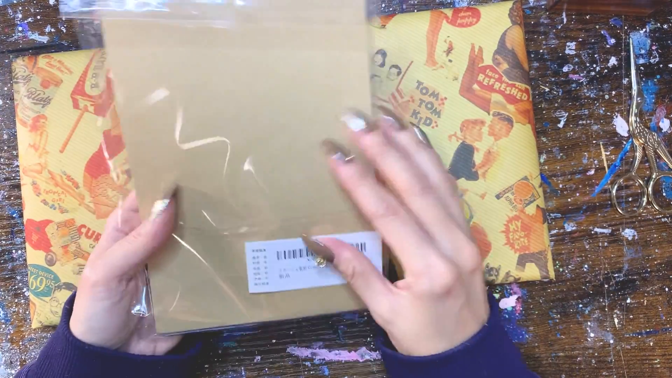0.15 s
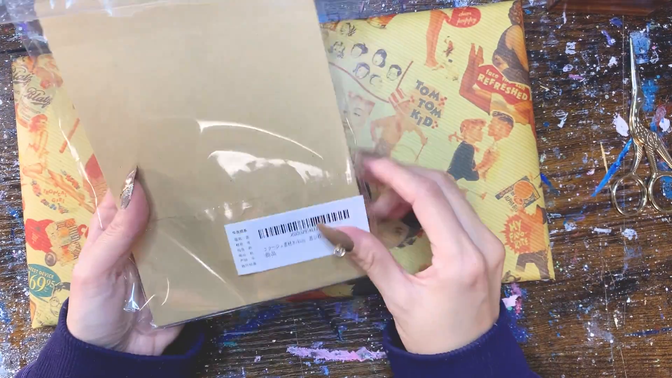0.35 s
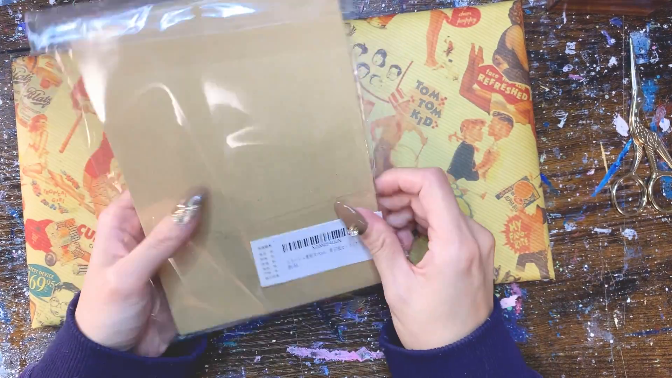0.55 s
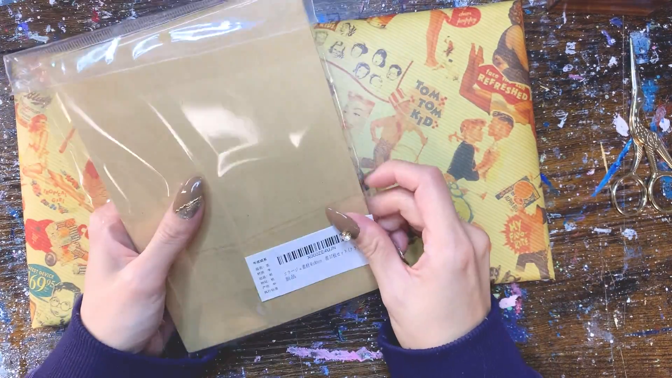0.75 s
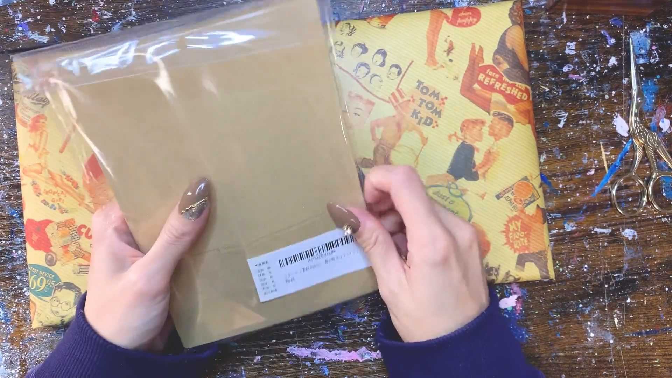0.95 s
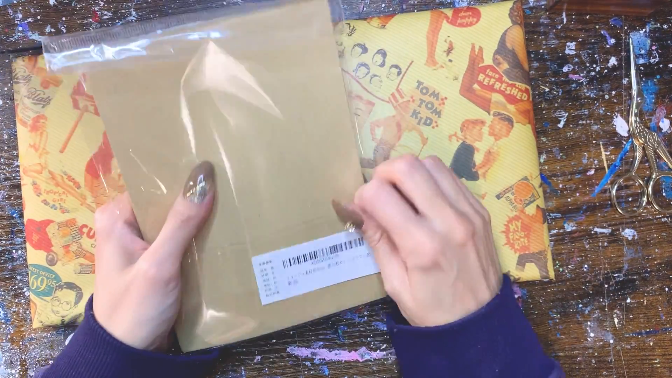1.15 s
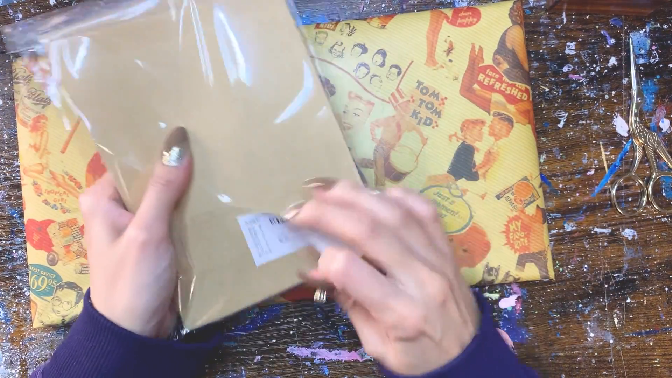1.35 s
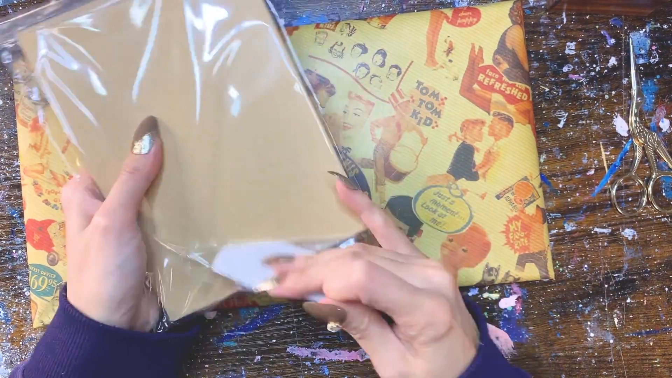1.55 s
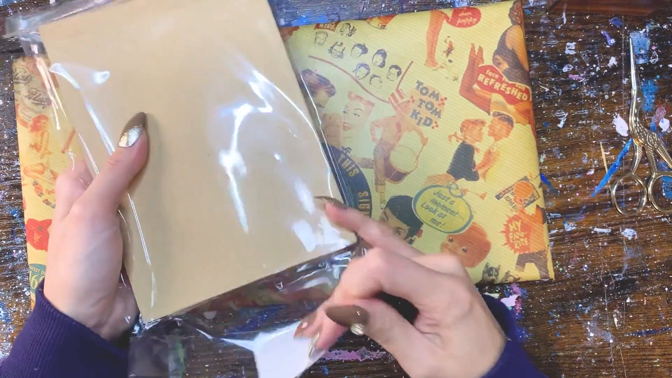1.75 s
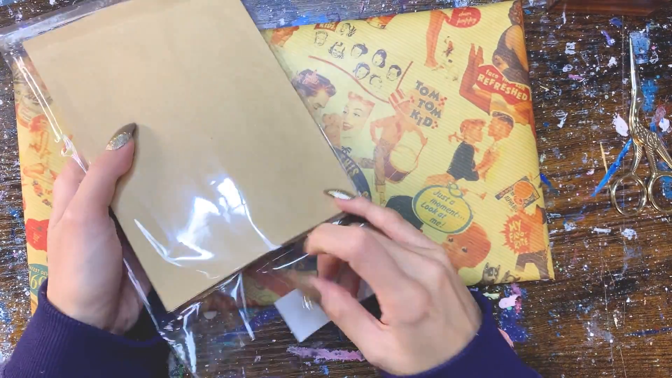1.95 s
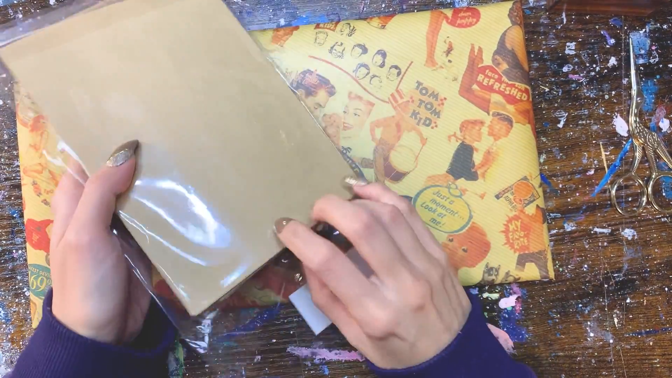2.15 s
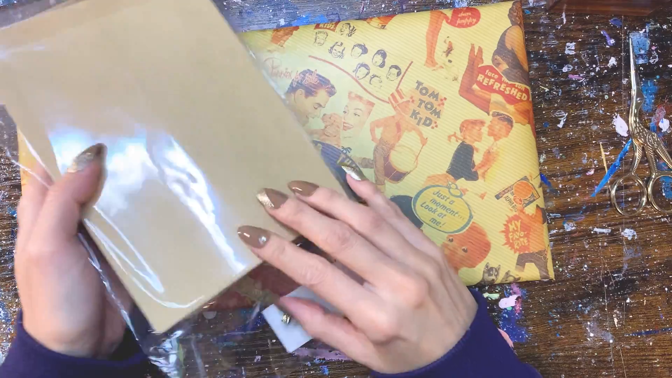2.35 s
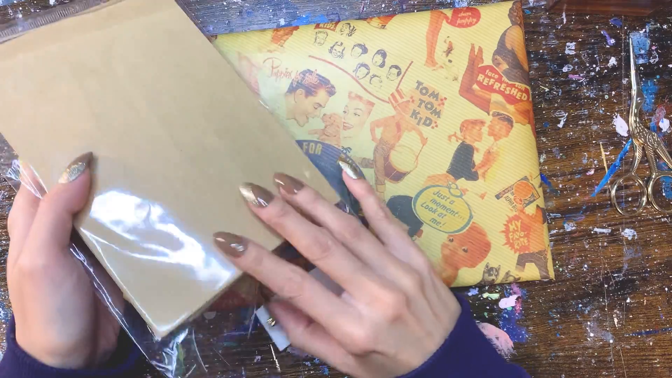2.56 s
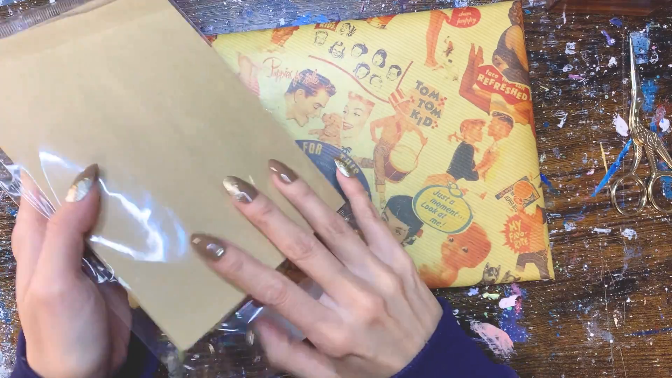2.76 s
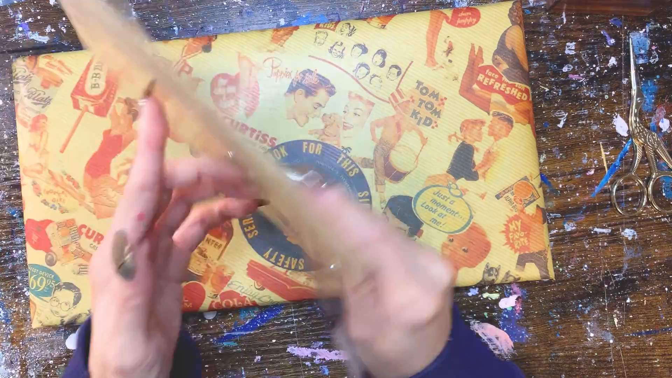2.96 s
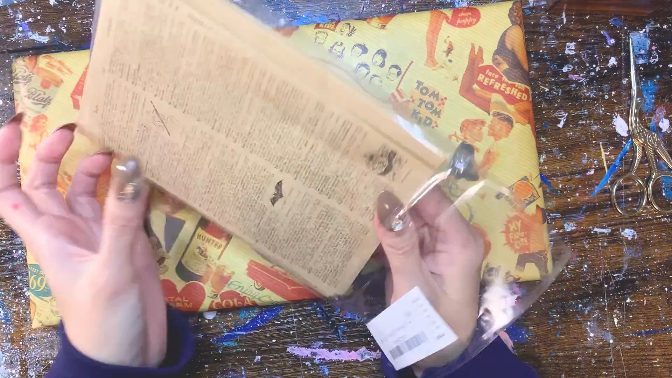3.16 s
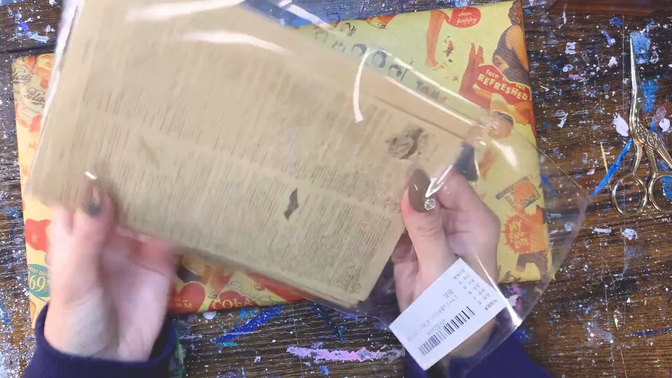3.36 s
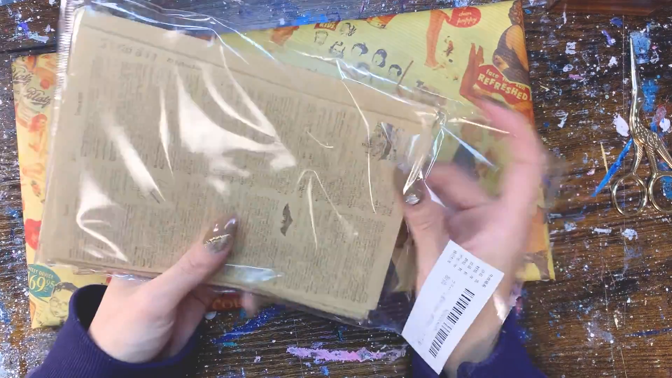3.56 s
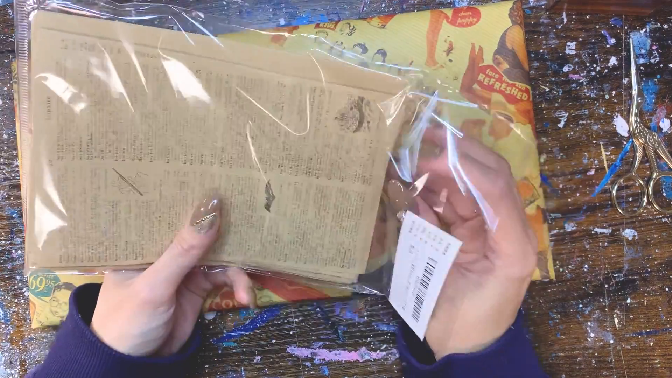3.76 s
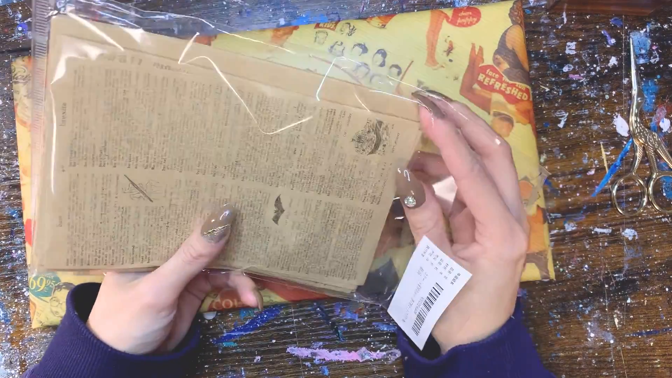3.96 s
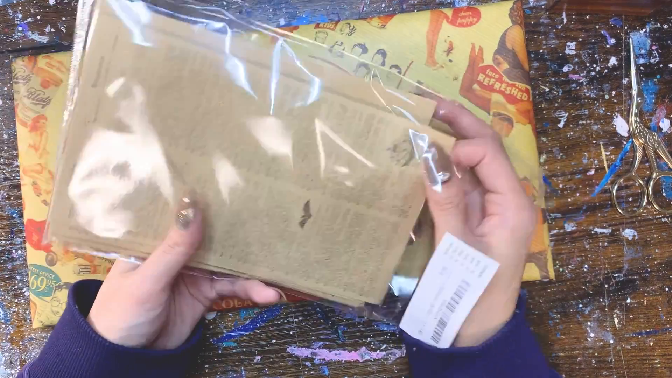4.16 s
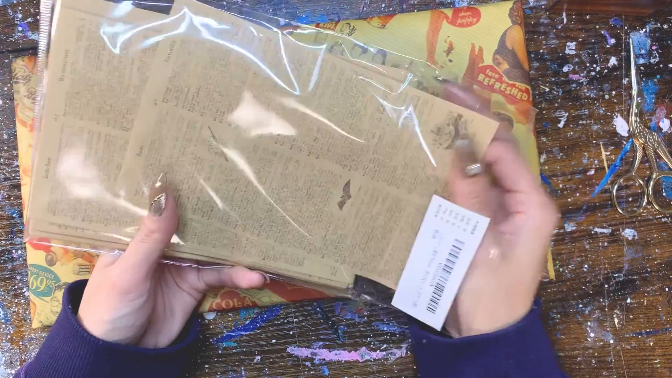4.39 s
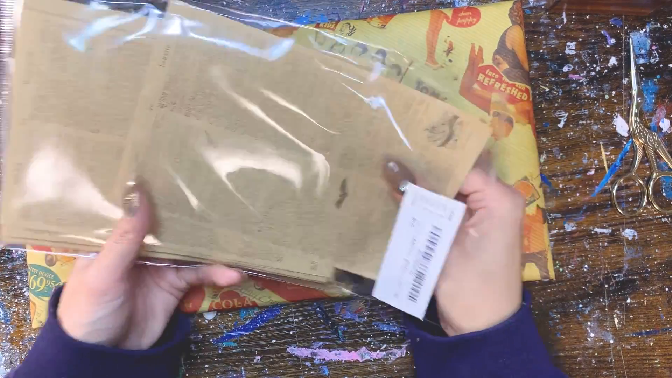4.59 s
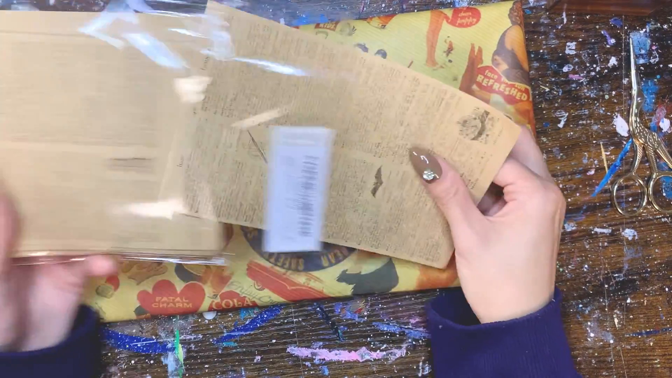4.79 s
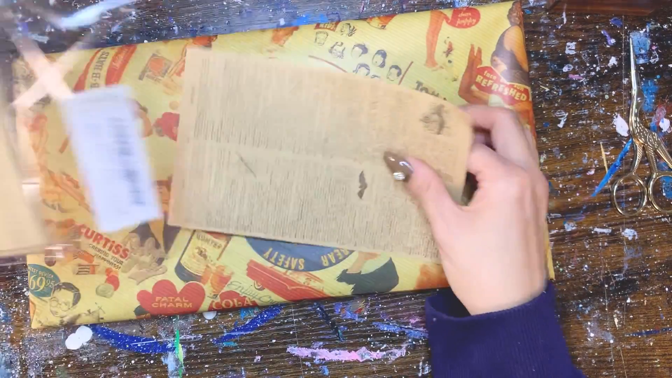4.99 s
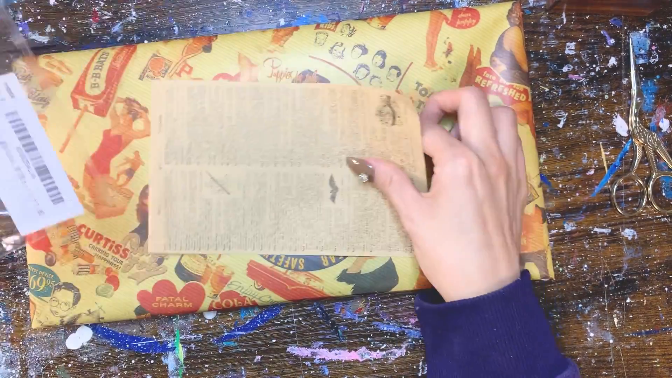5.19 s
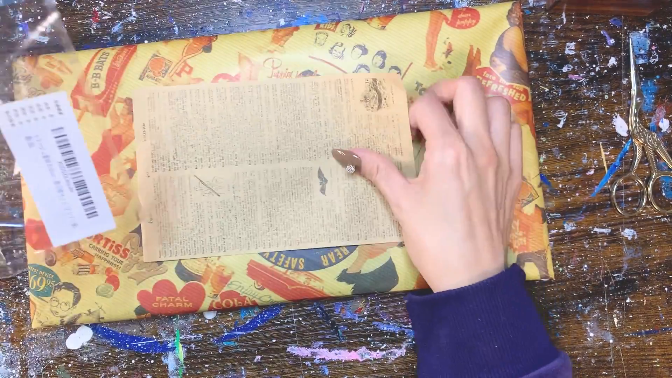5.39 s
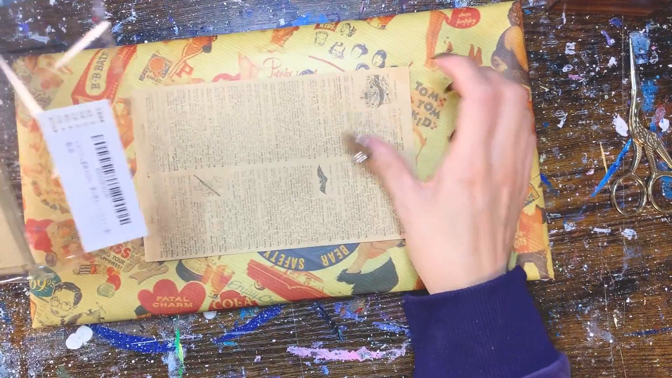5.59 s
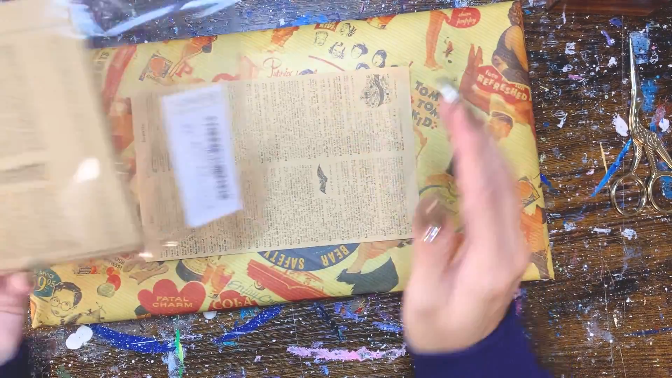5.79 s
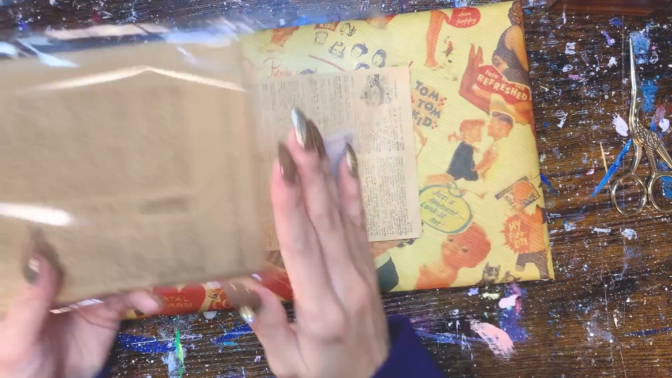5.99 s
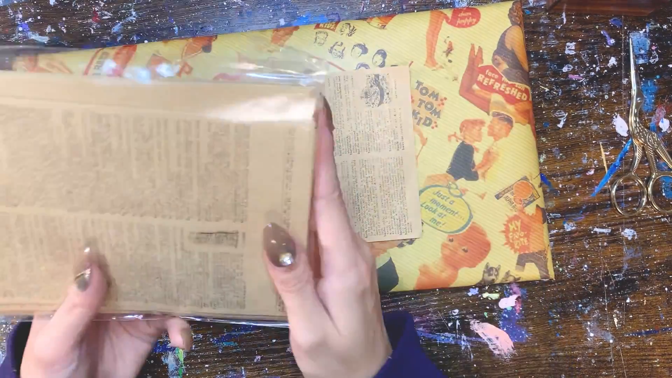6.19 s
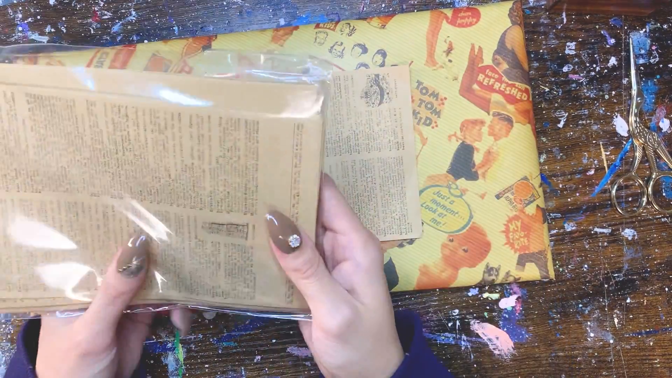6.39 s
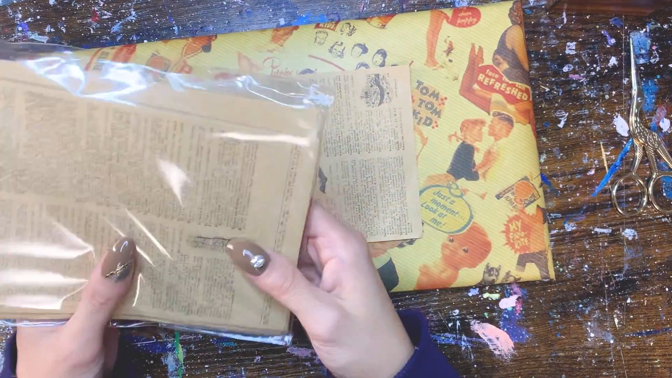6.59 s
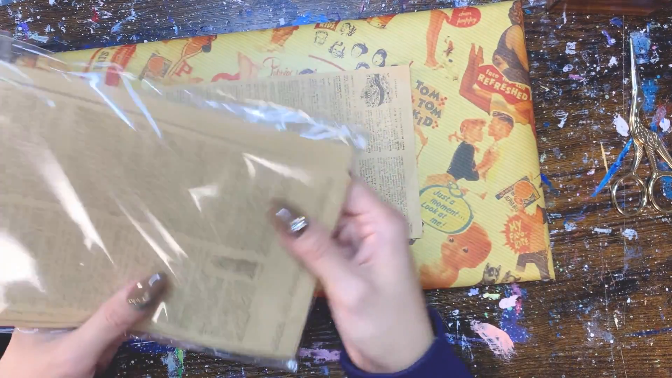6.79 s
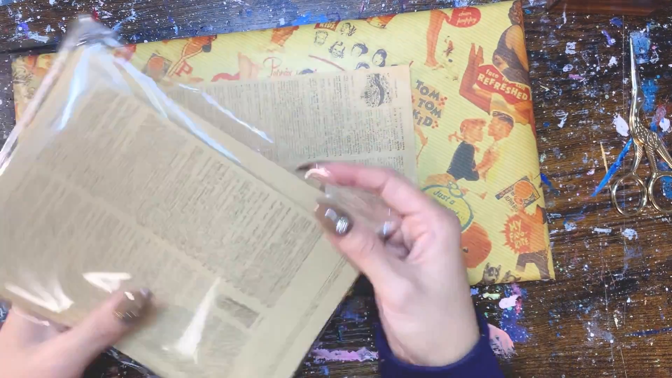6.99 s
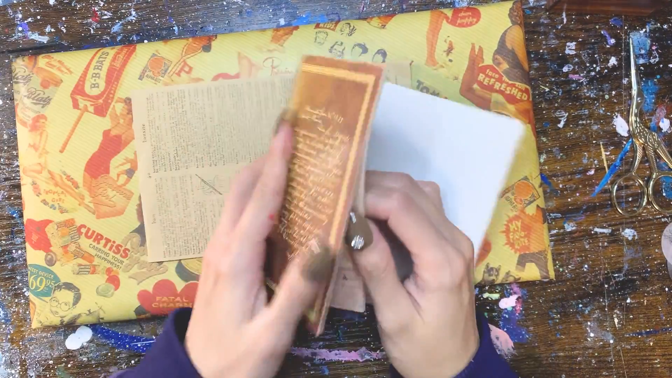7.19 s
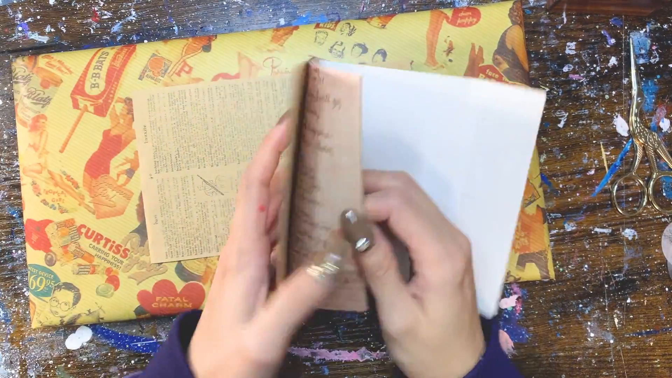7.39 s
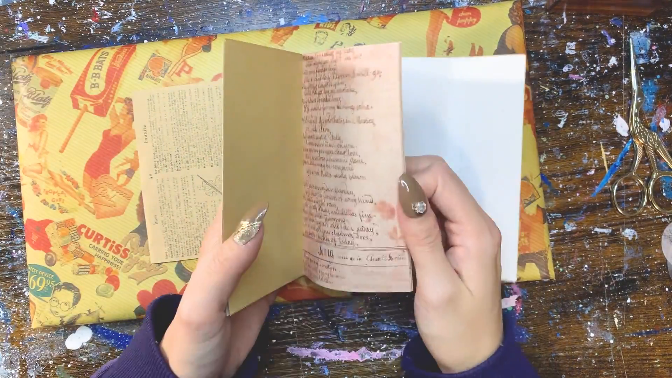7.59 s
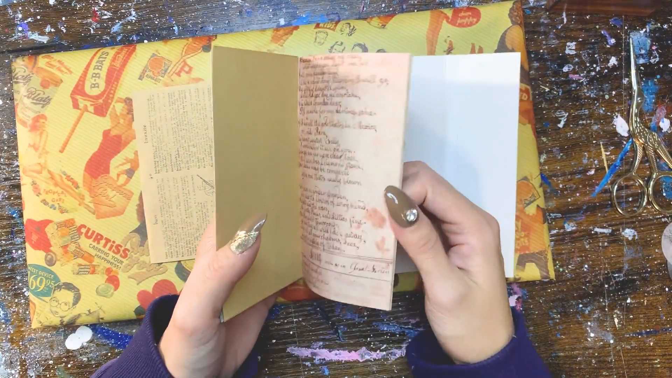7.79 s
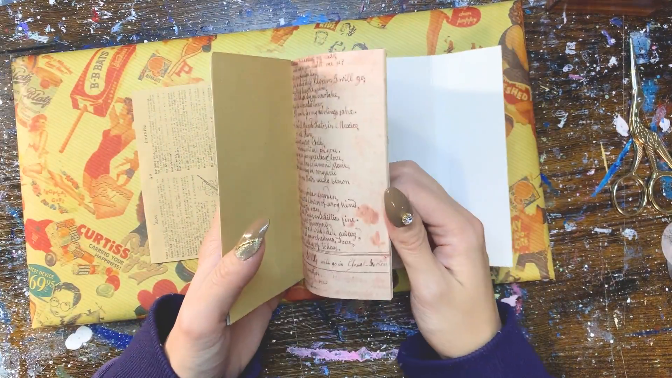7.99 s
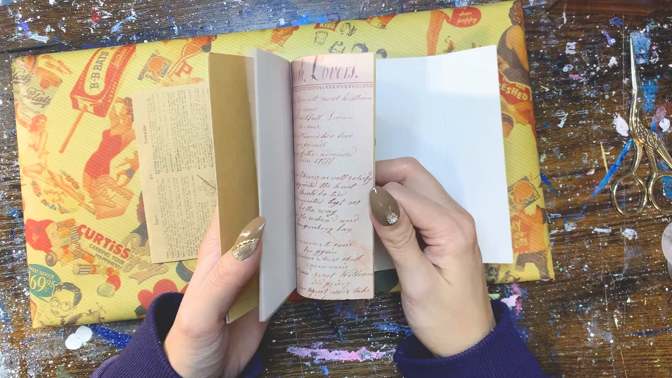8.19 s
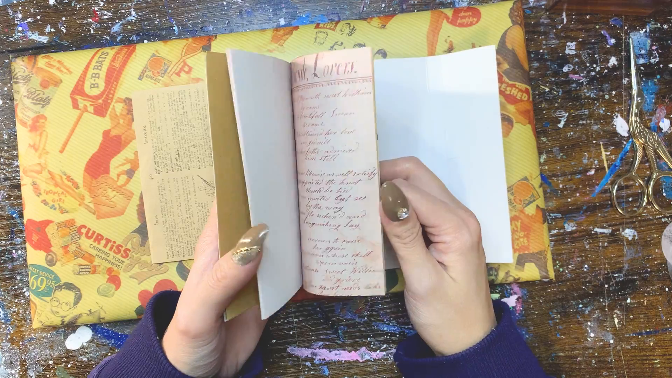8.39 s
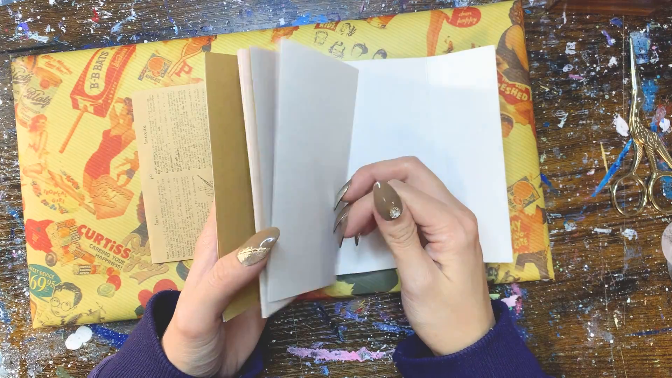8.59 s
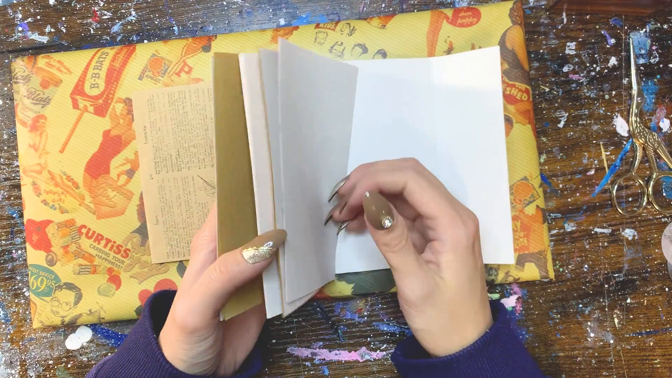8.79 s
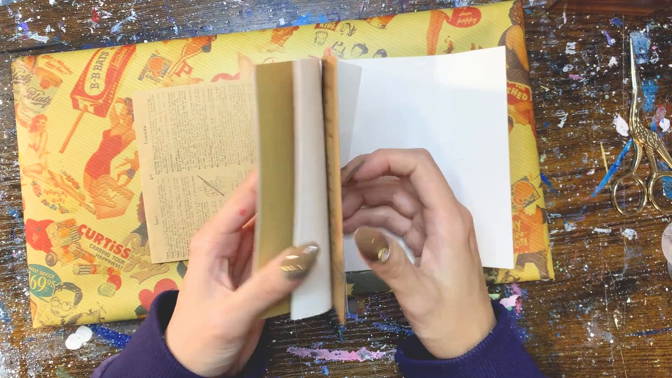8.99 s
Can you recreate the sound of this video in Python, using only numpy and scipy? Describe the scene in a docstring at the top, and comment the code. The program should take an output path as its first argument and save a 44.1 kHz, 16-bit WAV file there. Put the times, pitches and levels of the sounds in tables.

```python
"""A desk in a small quiet room: hands peel open a crisp plastic sleeve over a paper-wrapped parcel,
slide a paper sheet out and leaf through a booklet, with a stereo phone close above.
Creases snap over finer crackle, and film, sheet and page edges knock: noise bursts drive damped resonances.
Sliding sheets hiss as coloured noise under a hand envelope; the parcel thuds as falling, decaying tones.
Room tone, a short diffuse tail and two differing microphone ports surround them."""
import sys
import numpy as np
from scipy import signal
from scipy.fft import rfft, irfft
from scipy.io import wavfile
from scipy.ndimage import uniform_filter1d

SR = 44100
rng = np.random.default_rng(int(sys.argv[2]) if len(sys.argv) > 2 else 0)


def wav_record(signal):
    """Record a signal, one row per channel, as 16-bit PCM in the file named by sys.argv[1]."""
    frames = np.transpose(np.atleast_2d(signal))
    bounded = np.clip(frames, -1, 1)
    # unit amplitude maps onto the largest positive 16-bit level
    quanta = np.round(bounded * 32767).astype(np.int16)
    wavfile.write(sys.argv[1], SR, quanta)


N = 399105
FREQS = np.maximum(np.arange(N // 2 + 1) * SR / N, 1)
TIME = np.arange(N) / SR


def undb(db):
    """Amplitude ratio: 20 dB is a factor of ten."""
    return 10 ** (np.asarray(db) / 20)


def unit(x):
    """Normalization: scale to rms 1."""
    return x / np.sqrt(np.mean(x ** 2) + 1e-20)


def read(points, hz):
    """Interpolation: spectrum points joined on a log-frequency axis."""
    f, value = np.transpose(points)
    return np.interp(np.log(hz), np.log(f), value)


def noise(spectrum):
    """Spectral shaping: white noise weighted to a given colour, rms 1."""
    white = rfft(rng.standard_normal(N))
    return unit(irfft(white * undb(read(spectrum, FREQS)), N))


def walk(rate):
    """Random modulation: Gaussian knots, rate per second, joined by straight lines."""
    knots = rng.standard_normal(N // 40)
    return np.interp(TIME * rate, np.arange(len(knots)), knots)


def ring(x, hz, q):
    """Resonance: one damped mode driven by x."""
    return signal.lfilter(*signal.iirpeak(min(hz, SR / 3), max(q, 1), fs=SR), x)


def add(track, s, sound):
    """Superposition: mix a sound in at a time in seconds."""
    start = int(np.clip(s * SR, 0, N - 1))
    track[start:start + len(sound)] += sound[:N - start]


def envelope(moves, attack_s, release_s):
    """Power summation: overlapping hand movements (start_s, length_s, level_db) swell, hold and die away."""
    t = TIME[::40]
    start, length, db = np.transpose(moves)[:, :, None]
    swell = (np.minimum(t - start, 0) / attack_s) ** 2
    fade = np.maximum(t - start - length, 0) / release_s
    power = (undb(db) * np.exp(-swell - fade)) ** 2
    return np.interp(TIME, t, np.sqrt(np.sum(power, axis=0)))


def response(spectrum, band, size=1024):
    """Minimum phase: the causal impulse response of one band of a colour, by folding its cepstrum."""
    hz = np.maximum(np.arange(size // 2 + 1) * SR / size, 1)
    edges = np.sqrt((1 + (band[0] / hz) ** 10) * (1 + (hz / band[1]) ** 10))
    gain = undb(read(spectrum, hz)) / edges
    cepstrum = irfft(np.log(gain + 1e-4 * gain.max()))
    cepstrum[1:size // 2] *= 2
    cepstrum[size // 2 + 1:] = 0
    return irfft(np.exp(rfft(cepstrum)))


def band_levels(db, brightness_db, crack_db=0):
    """Spectral balance, for flap, crack and sizzle: tight wrinkles trade flap for sizzle, wide panels the reverse."""
    return db - brightness_db / 2, db + crack_db, db + brightness_db / 2


# Noise tone of the quiet room: frequency_hz, relative_level_db
ROOM_TONE = [(15, -40.5), (25, -0.5), (87, 2), (301, -6.5), (516, -16), (677, -16.5), (5280, -27),
             (11900, -25.5), (16000, -28.5)]
ROOM_TONE_DB = -60


def room_tone():
    """Stationary noise: a steady coloured background at a low rms."""
    return noise(ROOM_TONE) * undb(ROOM_TONE_DB)


# Whole panels flap, creases crack, tiny wrinkles sizzle: low_edge_hz, high_edge_hz
BANDS = [(150, 1600), (1600, 6000), (6000, 17000)]


def snaps(table, spectrum, facet_hz, facet_q, facet_db, pitch_spread, ragged_db, stretch, gather,
          trim_db, size=1800):
    """Buckling avalanche: separate jolts ring a panel and smaller facets, sized afresh for each snap."""
    out, t = np.zeros(N), np.arange(size) / SR
    colours = [response(spectrum, band) for band in BANDS]
    span, buckle_gap_s, buckle_s, between = .009 * SR, .0035, .0013, .25
    # the sheet flutters on faintly, without pitch
    flutter = undb(-24) * np.exp(-t / .009)
    for s, *levels_db, decay_ms, panel_hz in table:
        ragged = undb(ragged_db * np.repeat(rng.standard_normal(size // 20), 20))
        age = t * 1000 / (stretch * max(decay_ms, .5))
        starts = np.append(0, np.cumsum(buckle_gap_s * (.5 + rng.random(20))))
        latest = starts[np.searchsorted(starts, t, "right") - 1]
        jolts = between + np.exp(-(t - latest) / buckle_s)
        # the avalanche gathers, runs in jolts and stops short
        push = ragged * jolts * (1 - .8 * np.exp(-age / gather)) * np.exp(-age ** 1.5)
        for colour, hz, spread, ring_db, db, trim in zip(
                colours, [panel_hz, *facet_hz], pitch_spread, facet_db, band_levels(*levels_db), trim_db):
            grain = rng.standard_normal(size)
            facets = sum(ring(push * grain, hz * np.exp(spread * z), facet_q)
                         for z in rng.uniform(-1.9, 1.97, 2))
            sound = signal.fftconvolve((push + flutter) * grain + undb(ring_db) * facets, colour)
            # the energy is that of 9 ms at the given rms level
            add(out, s, sound * undb(db + trim) * np.sqrt(span / np.sum(sound ** 2)))
    return out


def crackle(rate, spread_db, facet_hz, facet_q, decay_s, size=384):
    """Shot noise: small buckles of uneven size, tuned within an octave if facet_q is above 0; rms 1."""
    count = int(rate * N / SR)
    when, big, pitch = rng.random((count, 3)).T
    grains = rng.standard_normal((count, size)) * np.exp(-np.arange(size) / SR / decay_s)
    hz = np.maximum(np.arange(size // 2 + 1) * SR / size, 1)
    detune = hz / (facet_hz * 2 ** (pitch[:, None] - .5))
    grains = irfft(rfft(grains) / (1 + 1j * facet_q * (detune - 1 / detune)))
    grains *= undb(-spread_db * np.log(np.maximum(big, .02)))[:, None]
    places = (when * (N - size)).astype(int)[:, None] + np.arange(size)
    return unit(np.bincount(places.ravel(), grains.ravel(), N))


def rustle(moves, spectrum, tick_rate, pop_rate, pop_hz, pop_db, spread_db, decay_s, hiss_db, catch_db,
           trim_db, attack_s, release_s, size=3000):
    """Friction and buckling: wrinkles tick in all bands, panels pop low, and rubbing faces hiss."""
    ticks = crackle(tick_rate, spread_db, 4000, 0, decay_s)
    pops = crackle(pop_rate, .7 * spread_db, pop_hz, 5, .001)
    # rubbing faces catch and let go many times a second
    catch = walk(60)
    out = np.zeros(N)
    for k, band in enumerate(BANDS):
        hiss = rng.standard_normal(N) * undb(catch_db * (catch + walk(18)))
        rough = ticks + undb(hiss_db[k]) * hiss
        sound = unit(signal.oaconvolve(rough, response(spectrum, band))[:N])
        if k == 0:
            sound = sound + undb(pop_db) * pops
        # even out the running power, so the hand sets the energy from moment to moment
        sound = sound / np.sqrt(uniform_filter1d(sound ** 2, size) + 1e-9)
        band_moves = [(s, length, band_levels(*levels_db)[k]) for s, length, *levels_db in moves]
        out += sound * undb(trim_db[k]) * envelope(band_moves, attack_s, release_s)
    return out


def shimmer(x, patchy_db, size=256):
    """Shifting contact: points of contact keep changing, so narrow patches of hiss flare and fade."""
    bands = signal.stft(x, nperseg=size)[2]
    patches = uniform_filter1d(rng.standard_normal(bands.shape), size=4, axis=0)
    patches = unit(uniform_filter1d(patches, size=5, axis=1))
    return signal.istft(bands * unit(undb(patchy_db * patches)))[1][:N]


def lesser_snaps(moves, over_db, spread_db, brightness_db, colour_spread_db, decay_ms, panel_hz,
                 panel_spread, count):
    """Random events: snap rows scattered over the hand movements, following their strength and brightness."""
    start, length, db, bright, *_ = np.transpose(moves)
    ends = np.cumsum(length)
    when = (np.arange(count) + rng.random(count)) / count * ends[-1]
    k = np.minimum(np.searchsorted(ends, when), len(ends) - 1)
    strength, colour, slowness, pitch = rng.standard_normal((count, 4)).T
    return np.transpose([start[k] + ends[k] - when,
                         db[k] + over_db + spread_db * strength,
                         bright[k] + brightness_db + colour_spread_db * colour,
                         decay_ms * np.exp(slowness / 2),
                         panel_hz * np.exp(panel_spread * pitch)])


# Hands flex the sleeve, opening it, turning it over and picking it up again; levels before band trims:
# start_s, length_s, level_db, brightness_db (sizzle over flap)
FLEXES = [(0.0, .02, -27.5, 4.5), (.055, .075, -34, 5), (.15, .11, -49, 1.5), (.27, .05, -48, 12),
          (.41, 0.065, -56, -2), (.465, .02, -56, 9), (.49, 0.046, -37, 7), (.57, .1, -35.5, 4),
          (.69, .05, -41, 3), (.77, .05, -45, -3.5), (.87, .13, -44, 5), (1.03, .07, -38, 1.5),
          (1.17, 0.038, -27.5, 7), (1.26, .12, -25, 16.5), (1.41, .17, -34.5, 12.5), (1.475, .05, -28, 7),
          (1.6, .07, -23, 8), (1.7, .1, -38.5, -3.5), (1.815, .095, -28, -6.5), (1.93, .19, -42, -12),
          (2.25, .08, -34, 0), (2.35, .07, -43, -17), (2.51, .06, -50, -11), (2.622, .055, -39.5, -6.5),
          (2.7, .1, -53.5, 1), (2.895, .045, -31, -0.5), (2.8, .08, -39.5, -7.5), (2.96, .21, -41.5, 2.5),
          (3.2, .23, -45, 4), (3.08, 0.076, -39, 0), (3.455, 0.032, -33.5, 4.5), (3.5, .19, -31.5, 5),
          (3.715, .04, -28.5, -2.5), (3.827, .03, -31.5, 7), (3.9, 0.028, -30, 10.5), (3.95, .06, -58, -26),
          (6.045, .06, -31.5, 1), (6.12, .04, -35.5, 6.5), (6.2, .11, -42.5, -0.5), (6.335, .08, -40, 0),
          (6.44, .19, -53, 5), (6.505, .03, -45.5, -7), (6.695, .02, -37, 1), (6.74, .19, -38.5, 4),
          (6.96, .09, -35, 4)]
# Loudest creases snapping through; levels before band trims, decay before stretch, pitch before spread:
# start_s, level_db, brightness_db (sizzle over flap), decay_ms, panel_pitch_hz
SLEEVE_SNAPS = [(0.0418, -23.5, 4.5, 1.1, 950), (0.088, -19.5, 8, 1.86, 690), (0.1532, -38, -8, 0.83, 920),
                (0.2774, -32.5, 4.5, 0.69, 1520), (0.3324, -39, 0, 0.45, 670), (0.5129, -37, 11, 0.5, 1130),
                (0.521, -38, 13, 0.7, 1300), (0.595, -26.5, 10.5, 1.1, 1020), (0.6095, -30, 9, 1, 1190),
                (0.6376, -27.5, 11, 1, 1260), (0.6868, -24.5, 12, 0.39, 1090), (0.692, -30.5, 8, 0.5, 1210),
                (0.775, -34, -2.5, 0.59, 1410), (0.8407, -42.5, -12, 0.35, 1260),
                (0.8701, -38.5, 9, 0.4, 1150), (0.884, -43, 31.5, 2.3, 1130), (1.023, -25.5, 10, 1, 1455),
                (1.038, -28, 14, 1, 950), (1.059, -38, 23, 0.5, 1110), (1.1102, -40.5, -13, 0.7, 1040),
                (1.134, -33.0, 23, 0.41, 890), (1.165, -25.5, 10.5, 5.4, 980),
                (1.1785, -33, 16.5, 0.7, 895), (1.1933, -34.5, 9.5, 1.5, 1130),
                (1.4525, -22.5, 17, 1.8, 1040), (1.4712, -19.5, 12.5, 1.1, 830),
                (1.478, -16.5, 13.5, 1.4, 1010), (1.4905, -16, 6, 2.1, 1030), (1.541, -20, 5.5, 2.4, 980),
                (1.593, -19, 3, 2.5, 1090), (1.607, -10.5, 4.5, 1.1, 1110), (1.634, -24, 2, 2.6, 1100),
                (1.647, -13.5, -5.5, 1.9, 980), (1.655, -11.5, 3, 2.9, 990), (1.676, -21.5, 5.5, 1.0, 640),
                (1.772, -22, -2, 3.2, 920), (1.8135, -25, 7.5, 1.7, 1110), (1.831, -26, 15.5, 0.5, 975),
                (1.8365, -27.5, 14.5, 1.1, 1100), (1.866, -13, 5, 4.1, 950),
                (1.8971, -31.5, 13.5, 0.4, 940), (1.919, -25.5, 10, 2.2, 960), (1.933, -29, 12, 1.3, 990),
                (1.9817, -26.5, 1, 1.7, 1090), (1.9966, -38, -24, 0.4, 970), (2.0175, -28, 8.5, 0.42, 1050),
                (2.0354, -33.5, -11, 0.81, 1020), (2.059, -20, 1.5, 0.34, 1100), (2.075, -26, 1, 2.5, 700),
                (2.1335, -25.5, 6, 0.41, 610), (2.176, -31, 9.5, 0.8, 1390),
                (2.2392, -19.5, -3.5, 1.4, 1040), (2.268, -28, 24.5, 1.2, 1110),
                (2.2986, -25, -8, 0.8, 1220), (2.334, -28.5, 2.5, 1.8, 1100), (2.629, -36.5, -19.5, 4, 910),
                (2.686, -36, 15, 0.43, 890), (2.8187, -39, 6, 2, 915), (2.852, -30, 9, 1.2, 765),
                (2.9063, -26.5, 3, 6.3, 950), (2.926, -25, 16, 6, 724), (3.073, -26.5, 6, 5.0, 1050),
                (3.128, -38, 23, 0.59, 1240), (3.142, -42.5, 1.5, 1.6, 1430),
                (3.26, -33.5, 2.5, 1.14, 1040), (3.4491, -32.5, 5, 4.9, 623), (3.4912, -20, 2.5, 1.2, 1200),
                (3.5025, -32.5, 20, 0.5, 1100), (3.518, -24, 13, 1, 1160), (3.569, -28, 9.5, 2.1, 820),
                (3.5926, -32, 22.5, 1.1, 1000), (3.639, -24.5, 9, 1.1, 735), (3.7053, -28, 6, 1, 734),
                (3.716, -16.5, 16.5, 0.92, 696), (3.736, -27.5, -2, 3.5, 890), (3.8, -24.5, 7.5, 0.84, 834),
                (3.8244, -9, 8.5, 0.89, 980), (3.8498, -27, -3, 0.9, 780), (3.896, -30.5, 24, 0.42, 795),
                (3.9074, -22.5, 11.5, 1.5, 1090), (3.92, -35, 8, 1.3, 720), (4.0318, -32, 15.5, 0.38, 820),
                (4.066, -19, 10.5, 1.4, 874), (4.183, -40, 23.5, 3.6, 1000), (4.197, -28.5, 20, 0.9, 665),
                (4.207, -35.5, 21, 0.8, 684), (4.2588, -25, 13.5, 0.59, 1340),
                (4.4433, -37.0, 21, 0.43, 940), (4.475, -35, 12, 2.7, 804), (4.544, -30, -9, 1.7, 780),
                (4.9136, -29, 8.5, 1.9, 1310), (4.9217, -37, 17, 0.43, 1150), (4.9551, -36, 5, 0.93, 1114),
                (6.029, -25, 3, 1.66, 788), (6.0477, -30, 14, 0.97, 550), (6.067, -31, 20, 6.3, 1230),
                (6.212, -39, 1.0, 0.42, 895), (6.269, -30.5, 21.5, 1.1, 1250), (6.3327, -40, 5, 0.6, 1380),
                (6.3595, -32, -7.5, 1.6, 1040), (6.366, -27, 3, 0.4, 1050), (6.4066, -35.5, 7, 5.9, 820),
                (6.6324, -34.5, -8, 6.1, 1190), (6.6676, -30, 20, 0.37, 1050),
                (6.6932, -22.5, 10, 0.5, 1170), (6.6975, -28, 19, 0.6, 1100),
                (6.786, -32.5, 19, 0.43, 1210), (6.849, -21.5, 14.0, 3.1, 1190),
                (6.892, -27.5, 2, 3.5, 630), (6.9318, -37, -2.8, 0.71, 840), (6.961, -26, 3.5, 2.2, 1140),
                (6.9905, -27, 11.5, 0.8, 990), (6.999, -24, 7, 0.46, 1390), (7.008, -38, 15, 0.4, 1100),
                (7.024, -33.5, 12, 0.43, 930), (7.0412, -35, 14, 0.4, 1070), (7.0625, -40, -3, 0.6, 1350)]
# The glued flap lets go in short, bright rips; level before band trims, decay before stretch:
# start_s, level_db, decay_ms
FLAP_RIPS = [(1.2322, -25, 1.1), (1.248, -24.5, 1), (1.266, -22, 1.7), (1.27, -25.5, 1.2), (1.28, -20, 1.2),
             (1.298, -17.5, 1.4), (1.305, -22, 1.2), (1.31, -15.5, 1), (1.317, -20.5, 1.8),
             (1.3321, -18.5, 0.93), (1.339, -17.5, 2), (1.366, -18.5, 1.5), (1.379, -15, 0.71),
             (1.4215, -26.5, 1.2)]
# crack is how far the middle band stands out
RIP_BRIGHTNESS_DB, RIP_CRACK_DB, FLAP_HZ = 14, -4.5, 1170
# Colours of the film and of its flap: frequency_hz, relative_level_db
SLEEVE_COLOUR = [(71, -40), (120, -6.5), (220, -14), (393, -8.5), (569, -4.5), (850, -5), (1200, -4.5),
                 (1600, -11.5), (1950, -4), (2750, -13), (3400, -11), (4900, -10.5), (6300, -10),
                 (9990, -5), (15000, -8.5), (16000, -13.5)]
FLAP_COLOUR = [(300, -14.5), (1200, -1.5), (1700, -15.5), (4000, -4.5), (7700, -7), (8600, 1.5),
               (16000, -5.5)]


def sleeve():
    """Snap-through buckling: stiff film gives loud snaps, lesser ones and flap rips over fine crackle."""
    lesser = lesser_snaps(FLEXES, over_db=-10.5, spread_db=3.5, brightness_db=-5.5, colour_spread_db=5,
                          decay_ms=0.5, panel_hz=1050, panel_spread=0.37, count=100)
    film = dict(facet_hz=[4000, 9500], facet_q=9, facet_db=[12, 9, 4], pitch_spread=[.08, .28, .22],
                ragged_db=3.0, stretch=2.94, gather=0.2, trim_db=[1, -.5, 0.5])
    creases = snaps([*SLEEVE_SNAPS, *lesser], SLEEVE_COLOUR, **film)
    rip_rows = [(s, db, RIP_BRIGHTNESS_DB, RIP_CRACK_DB, decay_ms, FLAP_HZ) for s, db, decay_ms in FLAP_RIPS]
    rips = snaps(rip_rows, FLAP_COLOUR, **film)
    fine = rustle(FLEXES, SLEEVE_COLOUR, tick_rate=420, pop_rate=160, pop_hz=1090, pop_db=-1, spread_db=5,
                  decay_s=.0012, hiss_db=[-14, -13, -10], catch_db=8.5, trim_db=[-2, -3.5, -2],
                  attack_s=0.021, release_s=0.011)
    return creases + rips + fine


# Soft bumps and taps, pitch at the middle of the glide: start_s, peak_db, pitch_hz, decay_ms
BUMPS = [(.004, -31, 70.4, 27), (1.186, -31, 39, 64), (1.488, -32.5, 126.6, 7.3), (1.637, -28.5, 63.4, 29),
         (1.894, -31.5, 74, 20), (2.861, -33.5, 66, 50), (2.932, -31.5, 140, 31), (3.174, -36.5, 120, 12),
         (3.237, -34.5, 85, 38), (3.297, -35, 84.3, 13), (3.373, -26.5, 93, 17), (3.74, -27.5, 136.6, 11),
         (3.828, -37.5, 92, 20), (5.866, -35.5, 72, 50), (6.035, -33, 109.7, 30), (6.8, -36, 90, 21),
         (6.948, -20.5, 72, 20), (7.085, -42.5, 70.5, 21), (7.39, -44, 69.8, 22)]
# Hands shifting the parcel on the desk, level before shift_db: start_s, length_s, level_db
SHOVES = [(.06, 0.1, -48), (1.2, .09, -46), (1.33, 0.21, -49), (1.62, 0.055, -30.5), (1.85, 0.1, -47),
          (2.0, 0.43, -54), (2.86, 0.094, -36.5), (3.0, 0.25, -47.5), (3.23, 0.21, -43), (3.48, 0.44, -42),
          (3.9, 0.99, -54), (5.85, 0.068, -46.5), (5.97, 0.14, -47), (6.15, 0.28, -51.5),
          (6.95, 0.076, -35.5), (7.08, 0.49, -60), (8.14, 0.1, -51.5), (8.48, 0.091, -48), (8.87, 0.1, -50)]
# Colour of the rumble: frequency_hz, relative_level_db
PARCEL_COLOUR = [(13, -40.5), (22, -23.5), (65, 1.5), (92, -9.5), (121, -1.5), (166, -17), (220, -17),
                 (290, -37.5), (480, -120)]


def parcel(shift_db=-3, rise_s=.004, sag=0.43, overtone=2.0, overtone_db=-7):
    """Contact stiffness: shoves rumble faintly; each bump thuds and drops in pitch as the pressure eases."""
    out = noise(PARCEL_COLOUR) * envelope(SHOVES, attack_s=0.021, release_s=0.03) * undb(shift_db)
    t = TIME[:SR // 2]
    for s, db, hz, decay_ms in BUMPS:
        fade = np.exp(-t * 1000 / decay_ms)
        phase = 2 * np.pi * np.cumsum(hz * (1 + sag * (fade - .5))) / SR
        tones = np.sin(phase) + undb(overtone_db) * fade * np.sin(overtone * phase)
        thud = (1 - np.exp(-(t / rise_s) ** 2)) * fade * tones
        add(out, s, undb(db) * thud / np.abs(thud).max())
    return out


# Soft, round knocks: slack film panels popping over, a fingertip tap on the sheet, page edges flicking;
# decay is that of the push: start_s, peak_db, pitch_hz, decay_ms
ROUND_KNOCKS = [(0.177, -27.5, 1050, 2.4), (0.656, -22, 1120, 1.3), (.802, -31.5, 704, 1.5),
                (1.503, -11, 1220, 1.9), (1.731, -15.5, 880, 3.1), (1.967, -21.5, 1050, 2.1),
                (2.094, -15.5, 900, 2), (2.252, -13.5, 1150, 2.2), (2.408, -19, 960, 2.2),
                (2.621, -18, 764, 2.4), (2.631, -18, 582, 3.4), (2.647, -22, 720, 2.8),
                (2.852, -21, 450, 3), (2.906, -20, 980, 2.5), (2.925, -21, 630, 1.9),
                (3.171, -29, 557, 2.3), (3.537, -27, 326, 4), (3.618, -21, 300, 2.9),
                (3.71, -24.5, 322, 14), (3.738, -21, 403, 6.2), (3.832, -26, 360, 10),
                (3.916, -27.5, 410, 2.6), (3.962, -25, 890, 1.4), (4.184, -20.5, 1090, 0.85),
                (4.228, -40, 1020, 2), (4.287, -13.5, 1000, 3.1), (4.331, -24, 895, 2.8),
                (4.347, -22.5, 780, 5), (4.42, -25, 990, 1.8), (4.474, -15, 810, 2.8),
                (4.5435, -10.5, 830, 1.9), (4.58, -30, 750, 2), (4.623, -16.5, 840, 0.51),
                (4.642, -15.5, 890, 0.99), (4.684, -31, 870, 2), (4.728, -19, 875, 3.8),
                (5.341, -23, 1650, 1.5), (5.589, -30.5, 537, 2), (6.028, -20.5, 607, 3.4),
                (6.031, -23.5, 303, 6.8), (6.049, -28, 446, 6.6), (6.3, -31, 610, 1.4),
                (8.53, -13, 2050, 4.3), (8.594, -15, 1320, 2.5), (8.609, -21, 1120, 1.8),
                (8.637, -21.5, 1050, 2.7)]
# Low modes of a knock: multiple_of_pitch (ratio), level_db
KNOCK_MODES = [(.42, -7), (0.761, 3), (1, 6.5), (1.36, -11)]


def round_knocks(q=5, rise_ms=0.39, linger_db=-24, linger_ms=12, size=2600):
    """Modal vibration: a soft push on film, sheet or page edge makes a few low modes ring briefly."""
    out, ms = np.zeros(N), np.arange(size) / (SR / 1000)
    for s, db, hz, decay_ms in ROUND_KNOCKS:
        fade = np.exp(-ms / decay_ms) + undb(linger_db) * np.exp(-ms / linger_ms)
        push = rng.standard_normal(size) * (1 - np.exp(-ms / rise_ms)) * fade
        sound = sum(undb(mode_db) * unit(ring(ring(push, hz * ratio, q), hz * ratio, 1))
                    for ratio, mode_db in KNOCK_MODES)
        add(out, s, undb(db) * sound / np.abs(sound).max())
    return out


# The sheet is pulled out, then pushed over the parcel; levels before band trims:
# start_s, length_s, level_db, brightness_db (sizzle over flap), crack_db (middle band over the others)
SLIDES = [(4.19, 0.4, -38, -1.5, -6.5), (4.255, 0.089, -38.5, 12.5, -5), (4.6, .15, -36, 8.5, -4.5),
          (4.754, 0.22, -39, 6.5, -2), (5.01, 0.12, -51, 14, 3), (5.1, 0.18, -52, 21.5, 6.5),
          (5.299, 0.079, -44, 10, 5), (5.393, .11, -50, 23.5, 7.5), (5.53, 0.13, -63, -8, 3.5)]
# Colour of the sliding sheet: frequency_hz, relative_level_db
SLIDING_COLOUR = [(120, -18.5), (300, 0), (500, -7), (850, -5.5), (1200, -8.5), (1690, -15), (2250, -11),
                  (3100, -19.5), (4300, -14), (7400, -21.5), (8500, -14.5), (12500, -17.5), (16000, -25)]


def sheet():
    """Sliding friction: a sheet leaves the sleeve with a bright, grainy hiss."""
    slides = rustle(SLIDES, SLIDING_COLOUR, tick_rate=330, pop_rate=69, pop_hz=890, pop_db=3, spread_db=2.0,
                    decay_s=0.0031, hiss_db=[-7, -1, 3], catch_db=1.5, trim_db=[-1, -.5, 1],
                    attack_s=0.008, release_s=0.017)
    return shimmer(slides, patchy_db=2)


# Nails and page edges flicking on paper; levels before band trims, decay before stretch:
# start_s, level_db, brightness_db (sizzle over flap), crack_db (middle band over the others), decay_ms
PAPER_FLICKS = [(5.267, -40, 15, 1, 0.45), (5.3282, -40, -3, 16.5, 1.04), (5.3411, -38, 1, 9.5, 0.91),
                (5.502, -44, 13, 5, 0.65), (5.5902, -61.5, -4, 20.5, 0.85), (5.681, -59, 8, 5, 0.53),
                (7.3276, -45, 21, 6, 3.6), (8.1091, -41, 18, -10.5, 3.8), (8.168, -39.5, 0, 5.5, 3.5),
                (8.425, -42, 6, -3, 2), (8.4336, -36, 7.5, -4, 0.63), (8.4571, -33.5, 3.5, -8.5, 1.1),
                (8.502, -33.5, 6, 4, 1.3), (8.523, -32.5, -9, 14.5, 1.6), (8.53, -35.5, 2, 16.5, 4.1),
                (8.544, -40, 6, 19.5, 1.7), (8.5783, -35, -8, 8.5, 1.1), (8.584, -29, -8, 4, 1.06),
                (8.8591, -35.5, 12.5, 3.5, 1.4), (8.9997, -48.5, 15, 15, 1.66)]
# The booklet is drawn out and its pages are turned:
# start_s, length_s, level_db, brightness_db (sizzle over flap), crack_db (middle band over the others)
PAGE_RUBS = [(7.1, 0.051, -44.5, 11.5, 2.5), (7.17, 0.15, -51, 16, 1.5), (7.32, 0.134, -50, 11, 0),
             (7.45, 0.1, -54, 6.5, 2), (7.58, 0.058, -62.5, -1.5, 5.5), (7.745, 0.035, -47.5, 3, 2),
             (7.82, 0.15, -65, 0, 3), (8.11, 0.031, -49, 5.5, 5), (8.17, 0.022, -43, -13, -4),
             (8.45, 0.077, -42.5, 0.5, 1.5), (8.525, 0.068, -43, -13, 3), (8.61, 0.039, -48, -3, 7),
             (8.705, 0.045, -44.5, 4, 3), (8.78, 0.12, -59, 7, 12.5), (8.875, 0.16, -45.5, 10.5, 5.5)]
# Colour of the pages: frequency_hz, relative_level_db
PAPER_COLOUR = [(120, -21), (220, -13), (420, -7), (900, -7.5), (1350, -0.5), (1700, -10), (2050, -7.5),
                (2700, -16), (5000, -15.5), (7000, -18), (12000, -17), (16000, -23)]
PAGE_HZ = 1150  # a page flaps at about this pitch


def paper():
    """Friction and release: pages rub over each other; nails and edges drag, then flick."""
    pages = rustle(PAGE_RUBS, PAPER_COLOUR, tick_rate=650, pop_rate=250, pop_hz=1040, pop_db=-6.5,
                   spread_db=3.0, decay_s=0.00074, hiss_db=[2, 1, 2], catch_db=2.4, trim_db=[0, 0, 0],
                   attack_s=0.023, release_s=0.019)
    flicks = snaps([(*flick, PAGE_HZ) for flick in PAPER_FLICKS], PAPER_COLOUR, facet_hz=[2000, 8500],
                   facet_q=1.25, facet_db=[8, 18, 0], pitch_spread=[.12, .12, .12], ragged_db=0.5,
                   stretch=4.64, gather=0.95, trim_db=[1, 0, 0])
    return shimmer(pages, patchy_db=1.5) + flicks


def room(x, wet_db, t60_s, treble_t60_s, damp_hz, gap_s):
    """Reverberation: the short diffuse tail of a small room, with its own decay time for the treble."""
    t = TIME[:SR // 2]
    low_pass = signal.butter(2, min(damp_hz, SR / 3), fs=SR, output="sos")
    high_pass = signal.butter(2, min(damp_hz, SR / 3), "high", fs=SR, output="sos")
    low = signal.sosfilt(low_pass, rng.standard_normal(len(t))) * np.exp(-np.log(1000) * t / t60_s)
    treble = signal.sosfilt(high_pass, rng.standard_normal(len(t)))
    treble = treble * np.exp(-np.log(1000) * t / treble_t60_s)
    tail = (low + treble) * (1 - np.exp(-(t / gap_s) ** 2))
    return undb(wet_db) * signal.oaconvolve(x, tail / np.sqrt(np.sum(tail ** 2)))[:N]


# Spread between the two microphone ports, for central sounds and for the sheet off to one side:
# frequency_hz, side_minus_mid_db
WIDTH = [(60, -23), (200, -7.5), (700, -8.5), (1250, -8), (2400, 3), (4400, 2), (8100, 3), (15000, -22.5)]
SLIDE_WIDTH = [(60, -15.5), (110, -19), (200, -10.5), (380, -16), (700, -5.5), (1290, -2.5), (2380, 5.5),
               (4400, 3), (8120, 2), (15000, -24)]
# Balance of the ports: frequency_hz, left_minus_right_db
TILT = [(700, -.5), (1300, -.5), (2400, 1), (4400, 2.5), (8100, 0)]


def ports(x, width):
    """Phase difference: the right port leads; desk reflections shift as sheets move and split the ports."""
    direct, scatter_s, shifts_per_s = .55, .0007, 24
    t = TIME[:SR // 200]
    scattered = np.zeros(N)
    for _ in range(4):
        desk = rng.standard_normal(len(t)) * np.exp(-t / scatter_s)
        reflected = signal.oaconvolve(x, desk / np.sqrt(np.sum(desk ** 2)))[:N]
        scattered += .5 * walk(shifts_per_s) * reflected
    mid = rfft(x)
    # the direct part of the side signal is a quarter cycle behind the mid
    side = np.sqrt(1 - direct ** 2) * rfft(scattered) - 1j * direct * mid
    side = undb(read(width, FREQS)) * side
    tilt = undb(read(TILT, FREQS) / 2)
    return np.array([irfft((mid + side) * tilt, N), irfft((mid - side) / tilt, N)])


def scene():
    """Superposition: sleeve, paper and parcel close to the phone, with the room around them."""
    background = room_tone()
    centre = sleeve() + parcel() + round_knocks() + paper()
    aside = sheet()
    # an independent tail for each channel
    walls = np.array([room(centre + aside, wet_db=-16, t60_s=.3, treble_t60_s=.21, damp_hz=6500, gap_s=0.004)
                      for _ in range(2)])
    return ports(centre + background, WIDTH) + ports(aside, SLIDE_WIDTH) + walls


TOP_HZ = 16100


def record(dry):
    """Saturation and band limiting: the phone flattens the hardest snaps and cuts the top."""
    rounded = dry / (1 + np.abs(dry / .95) ** 6) ** (1 / 6)
    return signal.sosfilt(signal.ellip(8, .2, 70, TOP_HZ, fs=SR, output="sos"), rounded)


dry = scene()
out = record(dry)
wav_record(out)
```